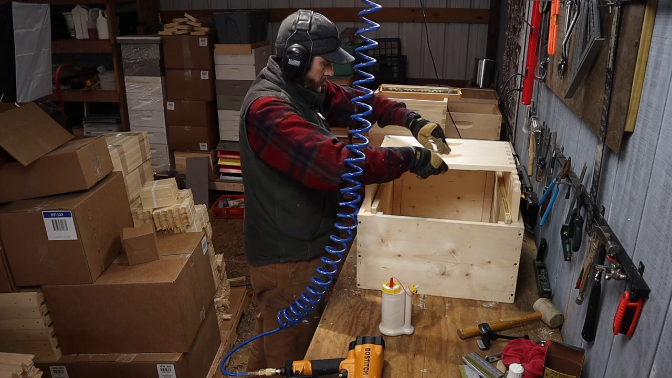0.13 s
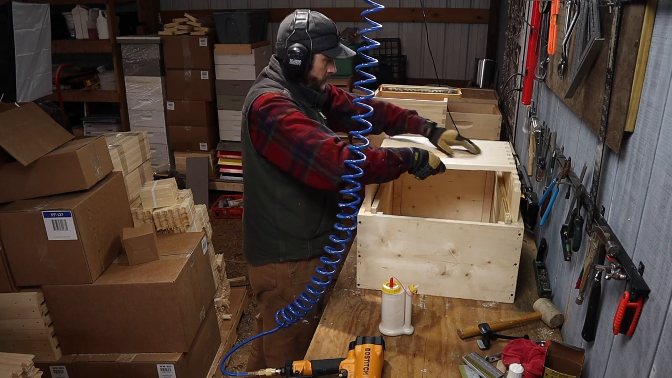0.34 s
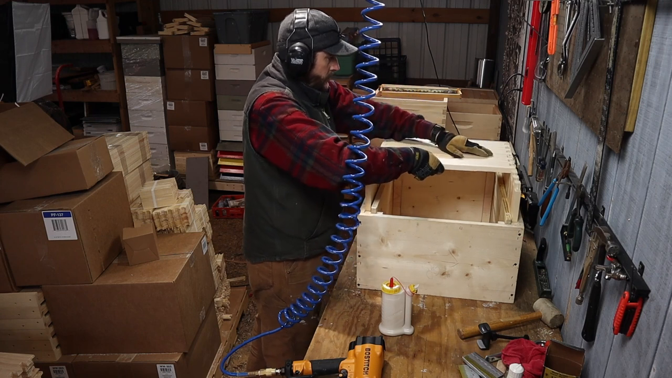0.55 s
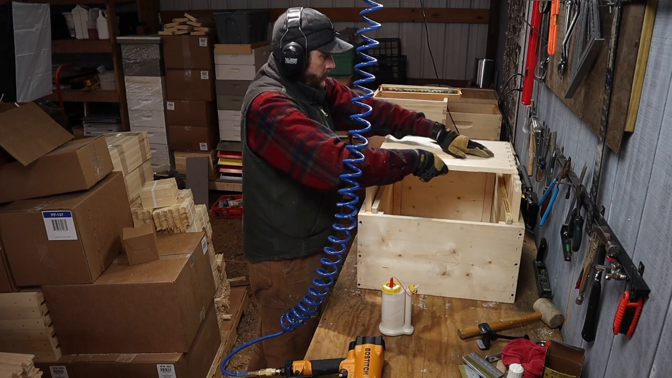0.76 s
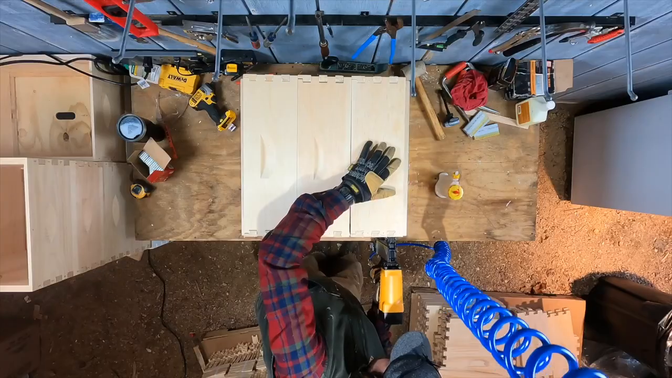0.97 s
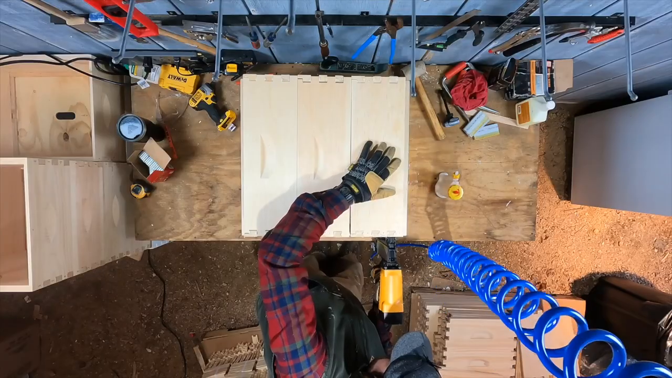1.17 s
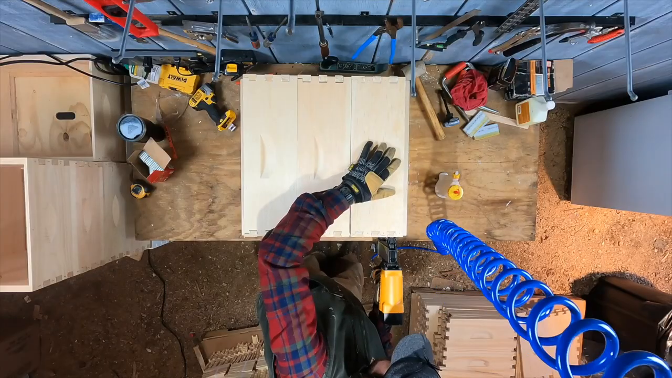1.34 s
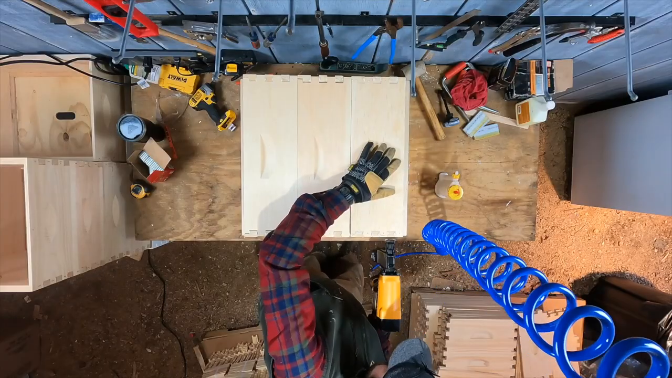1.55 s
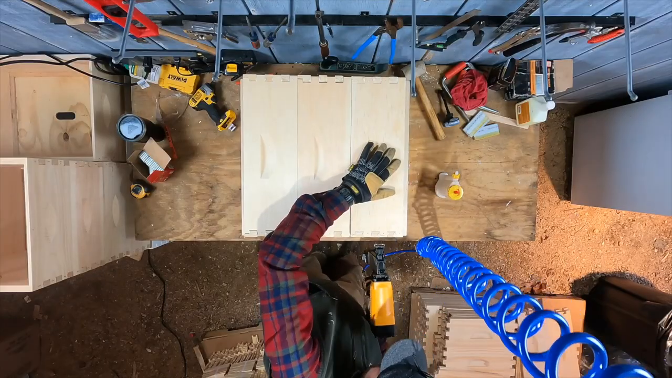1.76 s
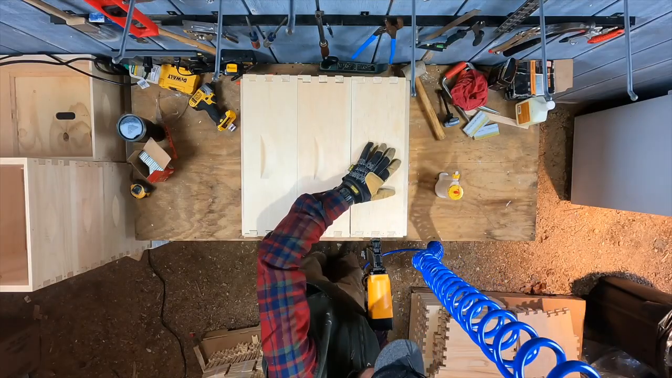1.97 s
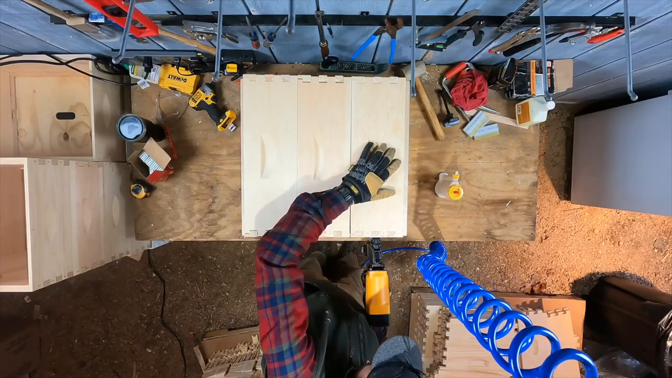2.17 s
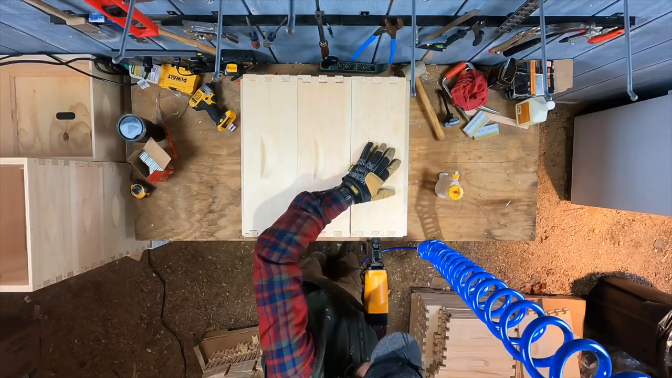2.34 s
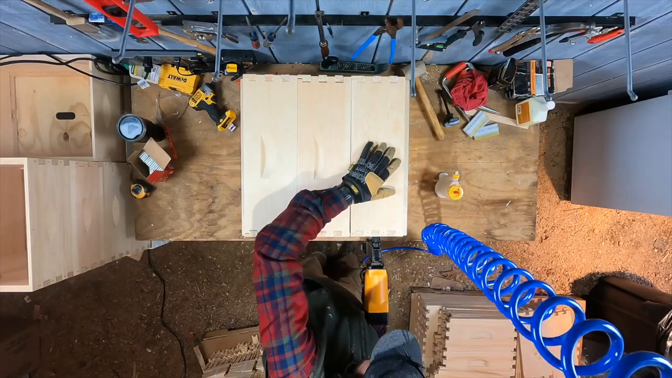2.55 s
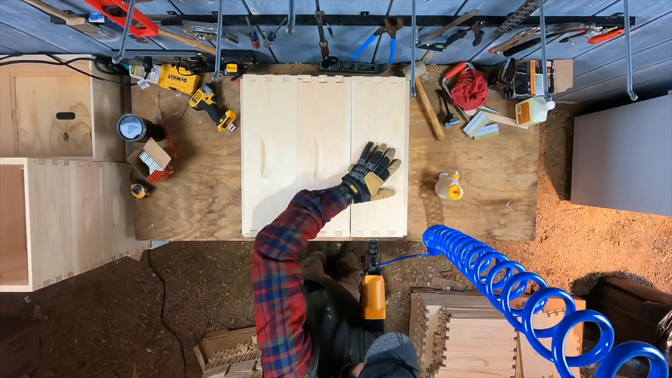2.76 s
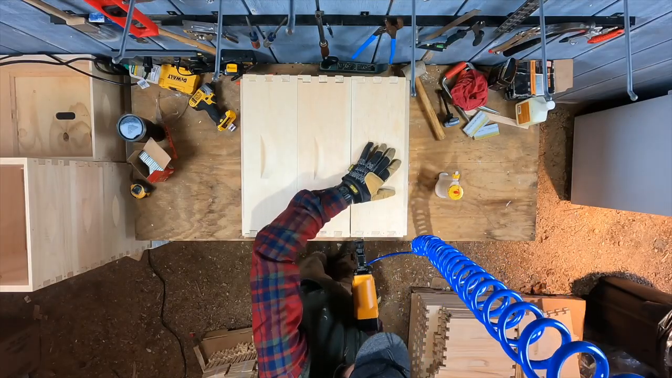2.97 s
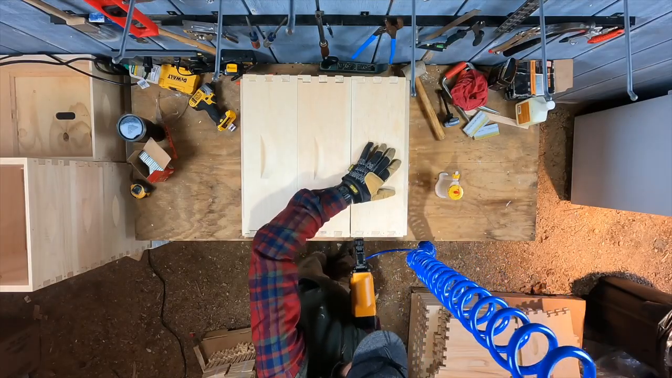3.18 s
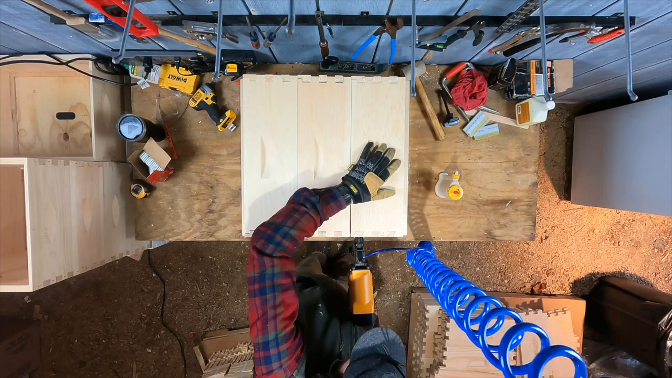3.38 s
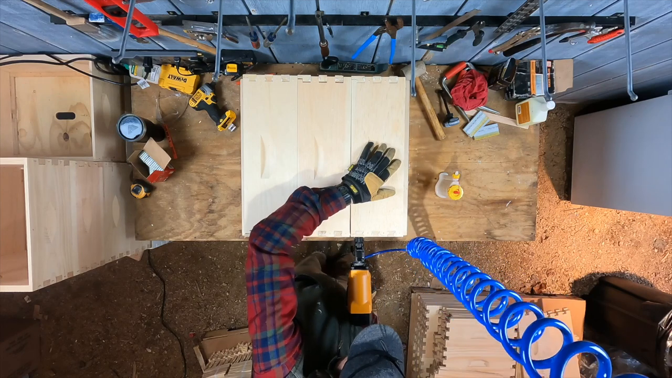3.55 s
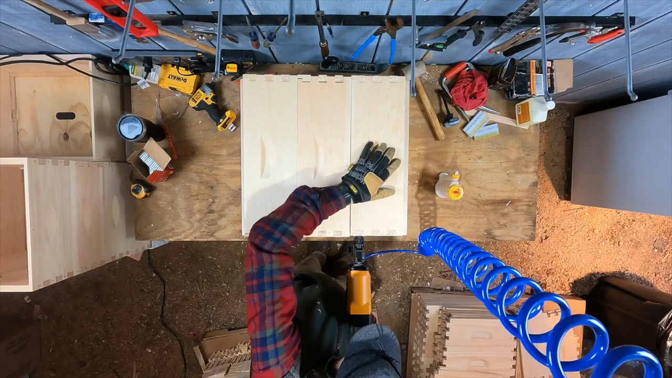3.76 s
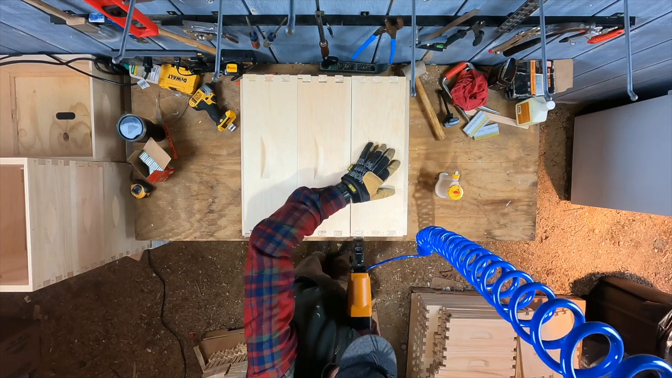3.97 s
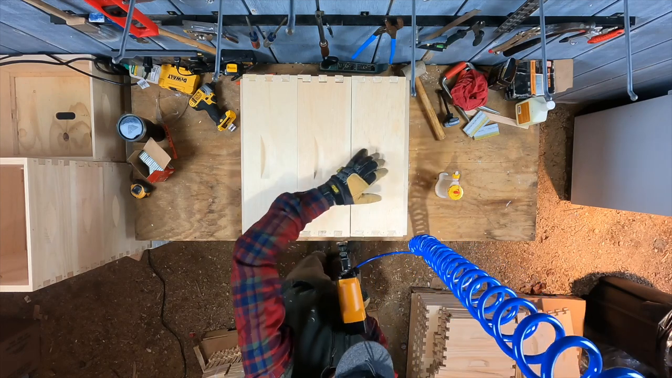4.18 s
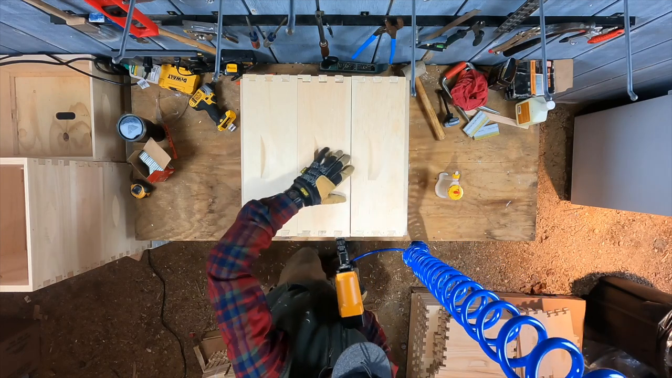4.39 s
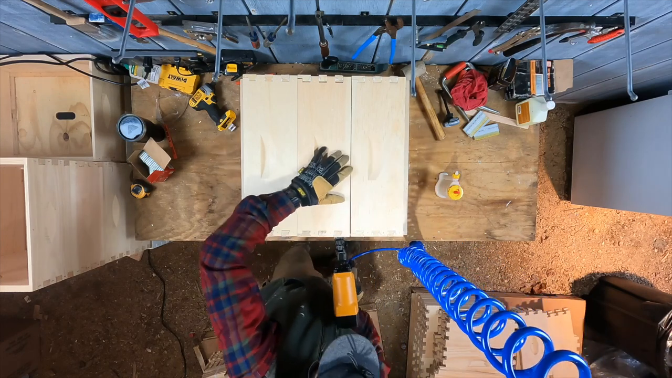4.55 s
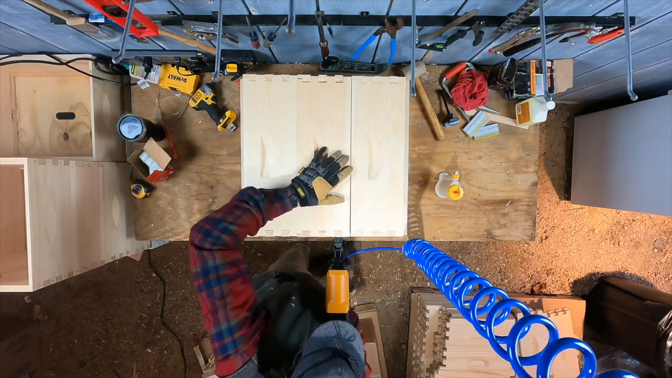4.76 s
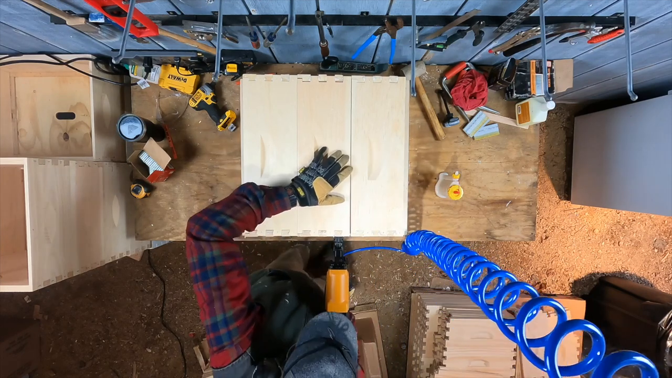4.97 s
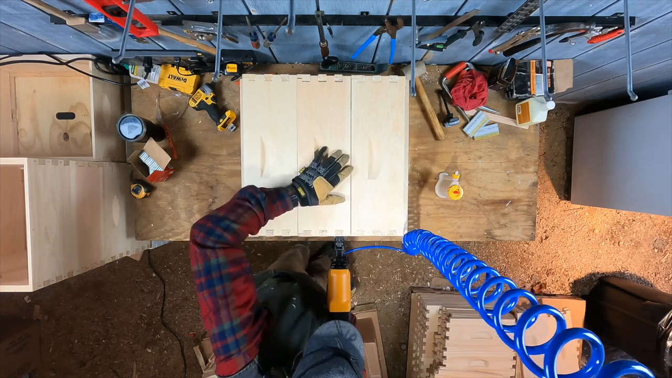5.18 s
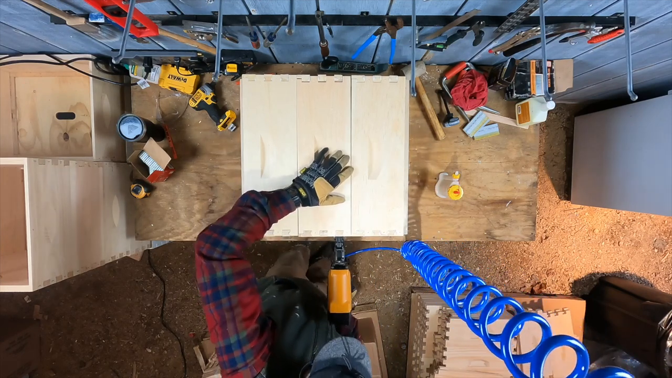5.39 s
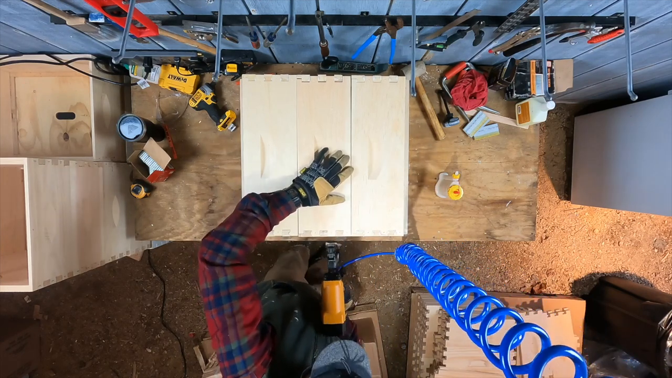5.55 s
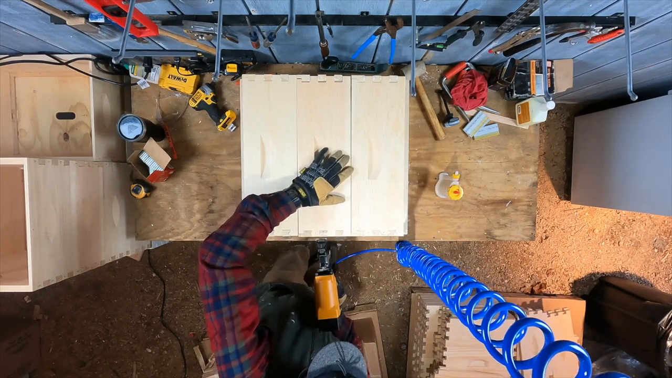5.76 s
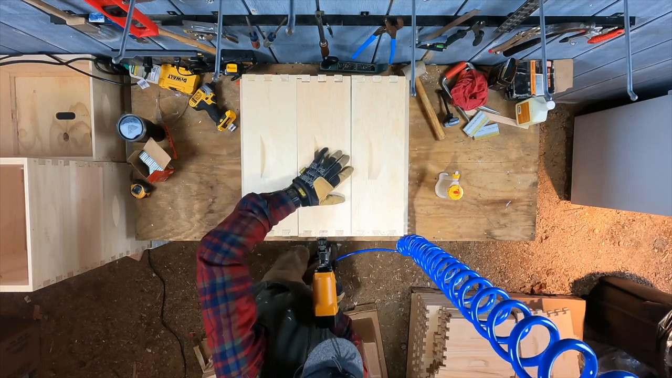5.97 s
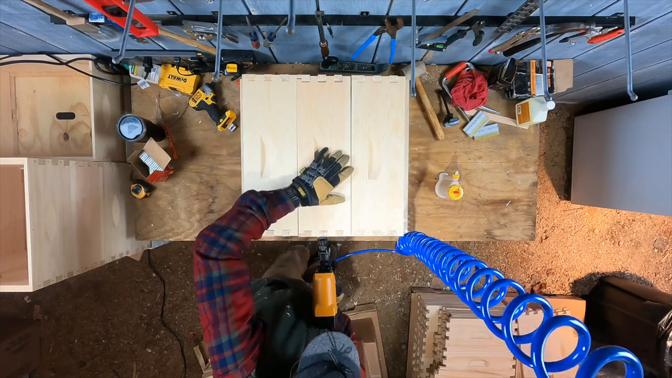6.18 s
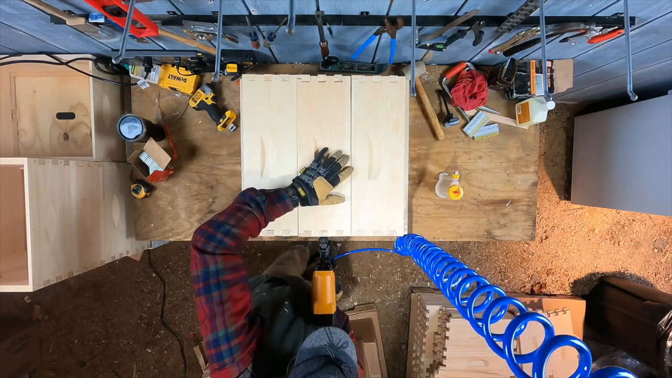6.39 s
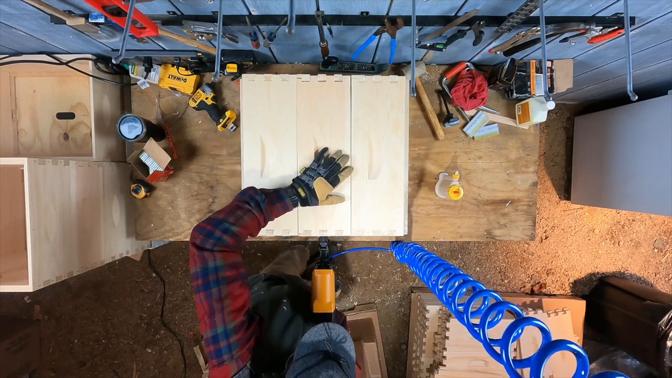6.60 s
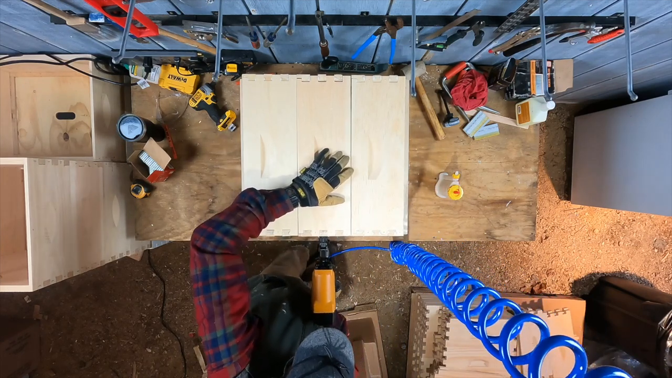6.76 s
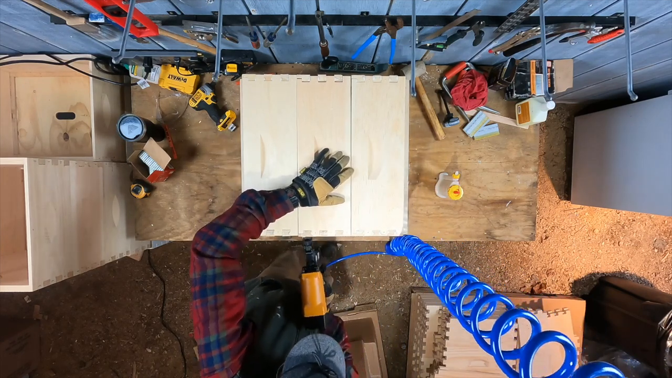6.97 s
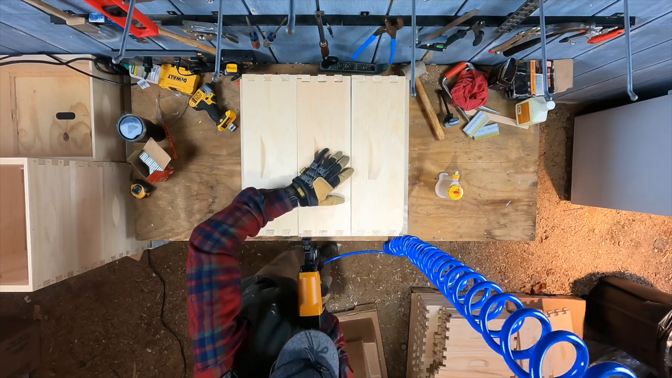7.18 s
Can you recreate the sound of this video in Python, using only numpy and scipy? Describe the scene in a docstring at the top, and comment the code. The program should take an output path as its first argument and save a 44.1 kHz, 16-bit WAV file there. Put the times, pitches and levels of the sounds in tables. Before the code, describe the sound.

An air stapler fires five sharp shots into a wooden box, with light knocks and clicks between them in a small workshop.

```python
"""A small workshop, heard through the bench: an air stapler fires five times into a wooden box.
In each shot, air kicks the tool against the wood, the driver (the blade that pushes the staple) lands
with a crack, spent air puffs out and the piston knocks home. The trigger ticks when let go.
Between shots, the tool's steel nose and a gloved hand knock, rub and shift on the boards."""
import sys
import numpy as np
from scipy import signal
from scipy.fft import rfft, irfft, next_fast_len
from scipy.io import wavfile
from scipy.ndimage import map_coordinates

SR = 44100
rng = np.random.default_rng(int(sys.argv[2]) if len(sys.argv) > 2 else 0)


def unload_wav(signal):
    """Save mono or channel-first audio to the path in sys.argv[1] as 16-bit WAV at rate SR, clipped to [-1, 1]."""
    wavfile.write(
        sys.argv[1],
        SR,
        np.round(np.clip(np.atleast_2d(signal).T, -1, 1) * 32767).astype(np.int16),
    )


N = 318843
TIME = np.arange(N) / SR


def amp(db):
    """Turn decibels into a gain."""
    return 10 ** (np.asarray(db) / 20)


def unit(x):
    """Scale a sound to an average (rms) level of 1."""
    return x / np.sqrt(np.mean(x ** 2) + 1e-20)


def along(points, hz, column=1):
    """Read between a table's rows on a log frequency scale."""
    cols = np.transpose(points)
    return np.interp(np.log(hz + 1), np.log(cols[0] + 1), cols[column])


def wobble(rate):
    """A smooth curve through `rate` random points a second."""
    return map_coordinates(rng.standard_normal(int(N * rate / SR) + 4), [TIME * rate])


def filtered(x, response):
    """Scale each frequency of x by response(hz)."""
    size = next_fast_len(len(x) + 8192)
    return irfft(rfft(x, size) * response(np.fft.rfftfreq(size, 1 / SR)), size)[:len(x)]


def noise(spectrum, size=N):
    """Noise with the given tone colour, at an average level of 1."""
    return unit(filtered(rng.standard_normal(size), lambda hz: amp(along(spectrum, hz))))


def add(track, start, sound):
    """Mix a sound in at `start` seconds."""
    part = track[round(start * SR):][:len(sound)]
    part += sound[:len(part)]


def swells(rows, power):
    """One rounded hump of loudness for each row."""
    return sum(amp(db) * np.abs(np.sin(np.pi * np.clip((TIME - start) / (end - start), 0, 1))) ** power
               for start, end, db in rows)


def burst(spectrum, rise, fade, shut=1):
    """Noise that swells, falls 60 dB in `fade` seconds and is cut off by `shut` seconds."""
    t = np.arange(SR // 6) / SR
    gate = np.clip((shut - t) / 0.0089, 0, 1)
    return noise(spectrum, len(t)) * (1 - np.exp(-t / rise)) * amp(-60 * t / fade) * gate


def ring(tones, contact_s, focus_hz, octaves, dead=0, scuff_s=0, scatter_db=2, firm=1):
    """A blow rings an object's tones, favouring those within `octaves` of the focus. Peak 1."""
    hz, db, fade = np.transpose(tones)[:, :, None]
    t = np.arange(SR // 6) / SR
    off_focus_db = np.minimum(6 * (np.log2(hz / focus_hz) / octaves) ** 2, 30)
    level_db = db - off_focus_db + scatter_db * rng.standard_normal(hz.shape)
    fade = fade * (1.2 - np.clip(dead, 0, 1))  # a deader blow dies sooner
    ringing = np.sum(amp(level_db - 60 * t / fade) * np.sin(2 * np.pi * hz * t), axis=0)
    pushes = rng.standard_normal(SR // 16) * (t[:SR // 16] < scuff_s)  # a scuff is many tiny pushes
    pushes[0] = firm  # strength of the first push
    force = np.convolve(pushes, np.hanning(3 + int(contact_s * SR)))  # longer contact sounds duller
    struck = signal.fftconvolve(ringing, force)[:len(t)]
    return struck / np.abs(struck).max()


# The workshop's echo. Each row: frequency in Hz, seconds to fade by 60 dB, level in dB.
ECHO = [(61, 0.62, -7), (250, 0.32, 3), (500, 0.38, 0), (1200, 0.5, -6), (3000, 0.51, -11.5),
        (7400, 0.35, -3.5), (10200, 0.08, -3.5), (16000, .18, -14.5)]
def room(x):
    """Each frequency dies at its own speed; every third of a second gets a new random echo."""
    wet, step = np.zeros(N), SR // 3
    for start in range(0, N, step):
        hz, t, spectrum = signal.stft(rng.standard_normal(SR * 3 // 4), SR, nperseg=256)
        decay = amp(along(ECHO, hz, column=2)[:, None] - 60 * t / along(ECHO, hz)[:, None])
        tail = signal.istft(spectrum * decay, SR, nperseg=256)[1]
        tail /= np.linalg.norm(tail)
        add(wet, start / SR + .008, signal.fftconvolve(x[start:start + step], tail))
    return wet


# The bench's low rumble. Each row: frequency in Hz, level in dB.
RUMBLE_COLOUR = [(12, -34.5), (20, -17), (54, 4.5), (200, 2.5), (260, -21), (440, -120)]
# The worker leans on the bench. Each row: start and end in seconds, level in dB.
LEANS = [(0.53, 0.70, -43), (0.79, 0.96, -46.5), (2.9, 3.1, -57), (5.58, 5.7, -53), (7.05, 7.3, -55.5)]
def bench_rumble(effort_db):
    """Shifting weight makes the bench rumble and heave."""
    weight = amp(effort_db - 1.5) + swells(LEANS, power=0.42)
    return weight * amp(2.2 * wobble(7) + 1.7 * wobble(23)) * noise(RUMBLE_COLOUR)


# Wood shifting on wood. Each row: frequency in Hz, level in dB.
BOARD_COLOUR = [(59, -40), (100, -34), (204, -2), (411, -0.5), (490, -5.5), (923, -10.5), (2500, -30.5),
                (3250, -50), (5500, -120)]
def loose_boards(effort_db, lumps, shot_times, peak_s=0.11):
    """The boards creep in lumps under the hands, and a soft, low swell of noise follows each shot."""
    ages = [np.maximum(TIME - start, 0) / peak_s for start in shot_times]
    after_shot_swell = amp(-41) * sum((age * np.exp(1 - age)) ** 3.84 for age in ages)
    return (amp(effort_db) + after_shot_swell) * amp(2 * lumps) * noise(BOARD_COLOUR)


# Moving cloth and air hose. Each row: frequency in Hz, level in dB.
RUSTLE_COLOUR = [(710, -34), (1200, -2), (2400, -11), (4310, -16.5), (11900, -32.5), (14700, -34),
                 (16000, -39)]
def rustle(effort_db, lumps):
    """Cloth and hose rustle louder the more the worker moves."""
    level_db = -68 + 0.9 * (effort_db - effort_db.mean())
    return amp(level_db + 1.1 * lumps + 1.2 * wobble(65)) * noise(RUSTLE_COLOUR)


# A glove rubbing wood. Each row: frequency in Hz, level in dB.
GLOVE_COLOUR = [(900, -20), (1500, 0), (2500, -3), (4200, -7), (8000, -13), (12000, -17), (16000, -23)]
# The glove's strokes. Each row: start and end in seconds, level in dB.
STROKES = [(0, .04, -67), (0.115, 0.221, -67.5), (0.423, 0.462, -71), (0.515, 0.629, -52),
           (0.687, 0.92, -65.5), (1.035, 1.086, -66)]
def glove():
    """The glove hisses along the grain, with a narrow, high whistle."""
    level = swells(STROKES, power=0.8) * amp(1.4 * wobble(79))
    whistle = lambda hz: 1 + 2.2 / (1 + ((hz - 9200) / 160) ** 2)
    return level * unit(filtered(noise(GLOVE_COLOUR), whistle))


# How much the hands and body move. Each row: time in seconds, level in dB.
EFFORT = [(0.0, -52.5), (0.3, -58), (0.64, -44.5), (0.72, -52), (0.94, -50), (0.98, -57.5), (1.3, -63),
          (1.71, -52), (2.1, -54), (2.37, -58), (3.0, -50), (3.2, -59), (3.54, -62.5), (3.75, -49.5),
          (4.1, -49), (4.93, -52), (5.6, -52.5), (6.04, -59.5), (6.3, -56), (6.9, -58.5), (7.11, -56.5),
          (7.23, -57.5)]
def handling(shot_times):
    """The worker's movements stir bench, boards and cloth together while the glove rubs."""
    effort_db = np.interp(TIME, *np.transpose(EFFORT))
    lumps = wobble(35)
    wood = bench_rumble(effort_db) + loose_boards(effort_db, lumps, shot_times)
    return wood + rustle(effort_db, lumps) + glove()


# The tool's steel tones. Each row: pitch in Hz, level in dB, seconds to fade by 60 dB.
STEEL_TONES = [(2650, -10, .015), (4050, 0, .03), (5200, -7, .015), (6300, -12, .012), (8800, -12, .01)]
# Steel clacking on wood. Each row: frequency in Hz, level in dB.
CLACK_COLOUR = [(1200, -17), (2600, 5), (4100, -1.5), (5400, -4.5), (9000, -22), (16000, -28.5)]
# A bright spit, as of air. Each row: frequency in Hz, level in dB.
SPIT_COLOUR = [(1000, -12), (2500, 0), (7000, -4), (12000, -10), (16000, -17)]
def ticks(rows, thinness, rattle_db):
    """A short ring of steel, a dry clack, a thin spit of treble and a faint rattle."""
    track = np.zeros(N)
    for start, db in rows:
        thin = np.clip(thinness - 0.42 * (db + 36.5), 0, 1)  # faint ticks lose the ring and clack
        steel = ring(STEEL_TONES, .00005, 4100, 1.6, dead=.45, scuff_s=.0015, scatter_db=3.5)
        add(track, start, amp(db - 2) * (1 - thin) * steel)
        add(track, start, amp(db - 7) * (1 - thin) * burst(CLACK_COLOUR, .0002, .014))
        add(track, start, amp(db - 3) * thin * burst(SPIT_COLOUR, .0002, .017))
        add(track, start, amp(db + rattle_db) * burst(CLACK_COLOUR, .00073, .19, shut=.065))
    return track


# The steel nose touches the wood. Each row: start in seconds, level in dB.
NOSE_TAPS = [(2.0607, -43.5), (2.3233, -50), (2.3442, -39), (3.404, -35), (4.4003, -48), (4.741, -28.5),
             (5.9318, -48), (6.283, -54), (6.385, -56), (6.429, -50), (6.534, -31.5)]
# Trigger and catch click, loudest when let go. Each row: start in seconds, level in dB.
TRIGGER_CLICKS = [(0.063, -48.5), (0.876, -46), (1.5556, -31.5), (2.5122, -49.5), (2.756, -32),
                  (3.9666, -32.5), (4.5785, -47), (5.1971, -47), (5.4888, -44), (5.5078, -30.5),
                  (6.965, -37.5)]
def nose_and_trigger(muffle_hz=9000):
    """The tool's small parts tick; the hand round the grip softens the highest treble."""
    nose = ticks(NOSE_TAPS, thinness=.12, rattle_db=-27)
    trigger = ticks(TRIGGER_CLICKS, thinness=.8, rattle_db=-18)
    return filtered(nose + trigger, lambda hz: 1 / (1 + 1j * hz / muffle_hz) ** 2)


# The wooden box's tones. Each row: pitch in Hz, level in dB, seconds to fade by 60 dB.
BOX_TONES = [(95, -18.5, 0.35), (205, -22, 0.04), (227.7, 0.5, 0.15), (279.9, -0.5, 0.13),
             (345.7, 1.5, 0.063), (455, 3, 0.063), (517.3, -4.5, 0.13), (644, 0, 0.13), (739.5, 1, 0.046),
             (862, -13, 0.03), (966, 2, 0.086), (1265, -11.5, 0.056), (1400, 2, 0.11), (1836, 13.5, 0.019),
             (2130, 9, 0.021), (2230, -8.5, .03), (2920, -57, .03)]
def box(contact_s, focus_hz, octaves, **touch):
    """One blow rings the wooden box."""
    return ring(BOX_TONES, contact_s, focus_hz, octaves, **touch)


# Knocks on the boards. Each row: start in seconds, level in dB, pitch in Hz, deadness from 0 to 1.
BOARD_KNOCKS = [(0.003, -14.5, 310, 0.94), (0.125, -33, 495, 0.8), (0.164, -28, 416, 0.6),
                (0.253, -17.5, 395, 0.7), (0.361, -32.5, 239, 0.9), (0.386, -24, 300, 0.56),
                (0.485, -19.5, 422, 0.64), (0.573, -26.5, 404, 0.54), (0.623, -25, 264, 0.3),
                (0.647, -22.5, 270, 0.73), (0.8, -37, 500, 0.6), (0.821, -28.5, 280, .4),
                (0.86, -41, 200, 0.8), (0.926, -29.5, 200, .6), (2.053, -23.5, 297, 0.73),
                (2.148, -33, 200, 0.34), (2.321, -28, 238, 0.2), (2.344, -22.5, 261, 0.6),
                (2.581, -31.5, 557, 0.6), (2.602, -20, 297, 0.8), (3.126, -33, 231, .4),
                (3.315, -39, 471, 0), (3.36, -30.5, 300, 0.46), (3.386, -34.5, 260, .5),
                (3.407, -25.5, 240, 0.7), (3.426, -22, 260, 0.83), (4.397, -20, 354, 0.13),
                (4.703, -33, 227, 0.3), (4.741, -10, 214, 0.92), (5.079, -32, 395, 0.63),
                (5.504, -27, 565, 0.63), (5.591, -29.5, 159, 0.94), (5.81, -31.5, 650, 0.76),
                (5.916, -20, 211, 0.7), (6.275, -42.5, 1300, .8), (6.357, -35.5, 199, 0.64),
                (6.384, -30.5, 300, .5), (6.431, -32.5, 300, .4), (6.508, -32.5, 318, 0.6),
                (6.532, -22, 420, 0.6), (6.54, -9, 225, 0.6)]
def knocks(low_cut_hz=104):
    """Soft, scuffing blows on the boards, with little deep bass."""
    track = np.zeros(N)
    for start, db, pitch, dead in BOARD_KNOCKS:
        contact_s = .27 / pitch  # a low knock comes from a broad, soft touch
        octaves = .8 - .04 * (db + 27)  # harder knocks ring fewer tones
        add(track, start, amp(db) * box(contact_s, pitch, octaves, dead=dead, scuff_s=.014, firm=17.4))
    return filtered(track, lambda hz: (1j * hz / (1j * hz + low_cut_hz)) ** 2)


# The rush of noise in a shot. Each row: frequency in Hz, level in dB.
BLAST_COLOUR = [(880, 9.5), (1500, 9), (1870, -3.5), (2880, -2), (4640, -8.5), (9010, -26), (13400, -48.5),
                (16000, -36.5)]
# The shots. Each row: start in seconds, level in dB, trigger's lead in seconds, trigger in dB,
# driver's delay in seconds, crack in dB, piston's return delay in seconds, return in dB, exhaust in dB.
# The later times and levels count from the first two.
STAPLE_SHOTS = [(1.3642, 0.5, 0.011, -28.5, 0.0094, -1.5, 0.051, -2, -41),
                (2.6189, -0.5, 0.0125, -8, .0092, -5.5, .034, -5, -40),
                (3.7904, 3.5, 0.0069, -34, 0.0084, -4, .0515, -7.5, -41.5),
                (5.2304, 1, 0.011, -29.5, .0088, -2, .0522, -1.5, -36.5),
                (6.7906, 1.5, 0.0071, -26.5, 0.0092, -1.5, 0.0522, -2, -33)]
def stapler():
    """Air drives the piston down and it springs home; the box rings at each step."""
    track = np.zeros(N)
    for start, db, lead, trigger_db, delay, crack_db, home, home_db, exhaust_db in STAPLE_SHOTS:
        pull, pull_db = start - lead, db + trigger_db
        hit, hit_db = start + delay, db + crack_db
        # The trigger is pulled.
        add(track, pull, amp(pull_db) * box(.0013, 590, .64, dead=.6, scuff_s=.0067))
        add(track, pull, amp(pull_db - 18.5) * burst(CLACK_COLOUR, .0044, .14, shut=lead))
        # The valve opens and air kicks the tool against the wood.
        add(track, start, amp(db) * box(.00039, 270, .76, dead=.47))
        add(track, start, amp(db - 21.5) * burst(BLAST_COLOUR, .00044, .17))
        # The staple bites, then the driver hits its stop.
        add(track, hit - .0026, amp(db - .5) * box(.0004, 500, .67, dead=.86))
        add(track, hit, amp(hit_db) * box(.0001, 784, .18, dead=.43))
        add(track, hit, amp(hit_db - 3) * box(.0001, 1000, 3.9, dead=.96))
        add(track, hit, amp(hit_db - 11) * snap(.00009))
        # The staple holder rattles and the recoil heaves the box.
        add(track, hit + .003, amp(hit_db - 6) * burst(BLAST_COLOUR, .00035, .025))
        add(track, hit + .003, amp(hit_db - 30) * burst(SPIT_COLOUR, .0004, .025))
        add(track, hit + .01495, amp(db - 8.5) * box(.0017, 90, .87, dead=1))
        # The vent pops open and blows until the piston is home.
        vent_s = home - delay - .013
        add(track, hit + .015, amp(db - 32) * burst(SPIT_COLOUR, .0008, .045))
        add(track, hit + .015, amp(db + exhaust_db) * burst(CLACK_COLOUR, .002, .3, shut=vent_s))
        # The nose falls back, then the piston knocks home.
        add(track, hit + .02, amp(db - 11) * box(.0014, 297, .63, dead=.4, scuff_s=.022))
        add(track, start + home, amp(db + home_db) * box(.0005, 496, .18, dead=.79))
        add(track, start + home, amp(db + home_db - 23) * burst(CLACK_COLOUR, .0004, .0084))
    return track


def snap(width_s):
    """One sharp jump in pressure that falls back through zero."""
    age = np.arange(SR // 100) / SR / width_s
    return (1 - age) * np.exp(-age)


def scene():
    """Shots, knocks and ticks echo in the room, over the quiet sounds of handling."""
    shots, blows, steel = stapler(), knocks(), nose_and_trigger()
    echo = room(amp(-15.5) * shots + amp(-18.5) * blows + steel / 14)
    heavy_bench = lambda hz: (1j * hz / (1j * hz + 45)) ** 3  # it does not follow the slowest pushes
    struck = filtered(shots + blows + steel + echo, heavy_bench)
    shot_times = [shot[0] for shot in STAPLE_SHOTS]
    return (struck + handling(shot_times))[None]


# The microphone's own hiss. Each row: frequency in Hz, level in dB.
HISS_COLOUR = [(1500, -22.5), (4000, -4.5), (9000, -3), (16000, -16.5)]
def record(dry, top_hz=16000):
    """The microphone hisses, squashes the loudest peaks and passes nothing above top_hz."""
    heard = dry[0] + amp(-82.5) * noise(HISS_COLOUR)
    clipped = heard / (1 + np.abs(heard) ** 8) ** (1 / 8)
    return filtered(clipped, lambda hz: hz < top_hz)[None]


dry = scene()
out = record(dry)
unload_wav(out)
```